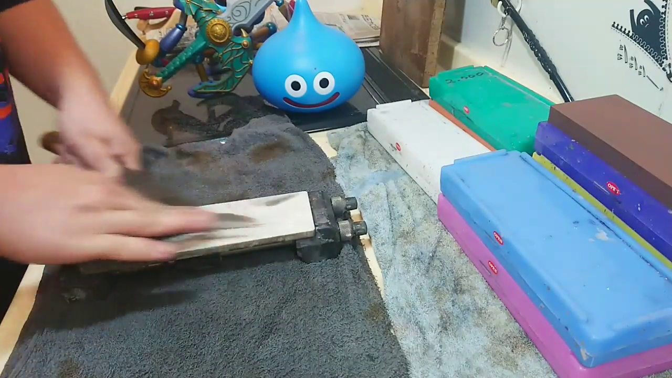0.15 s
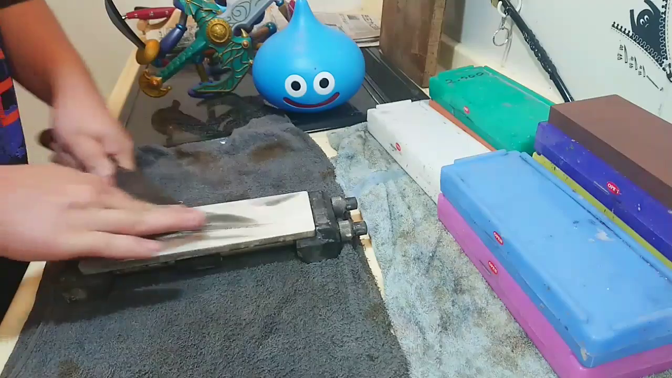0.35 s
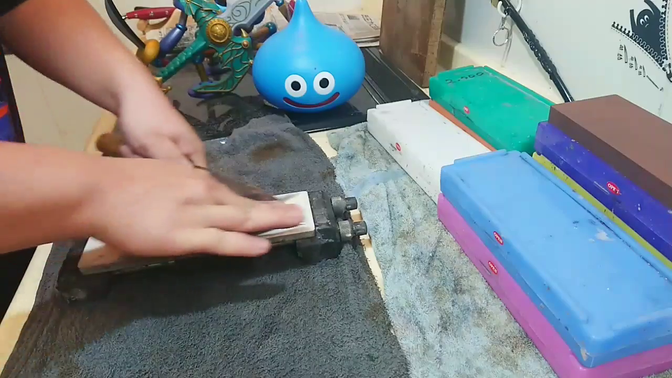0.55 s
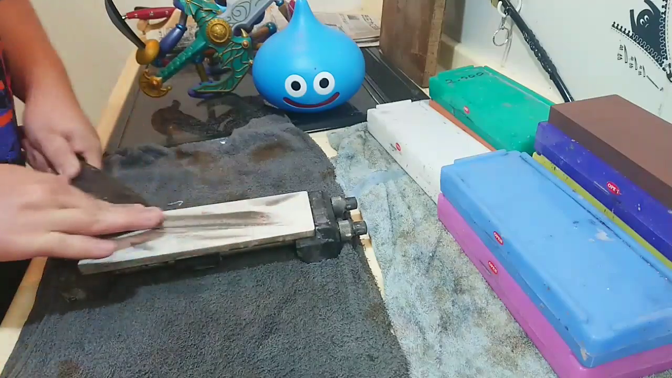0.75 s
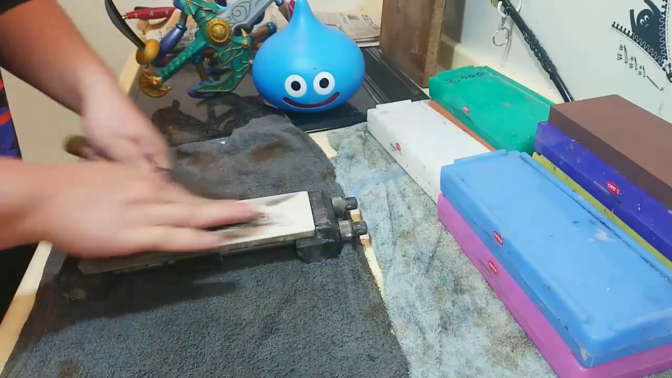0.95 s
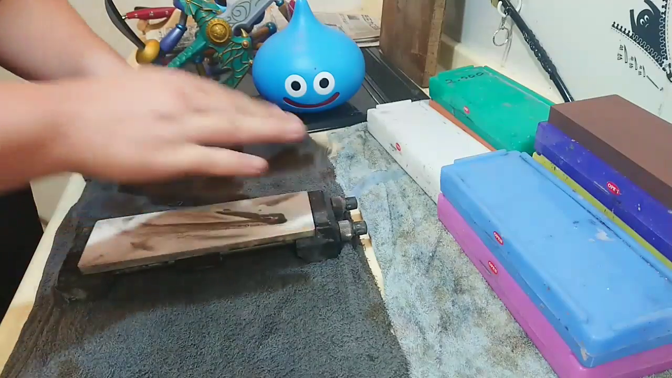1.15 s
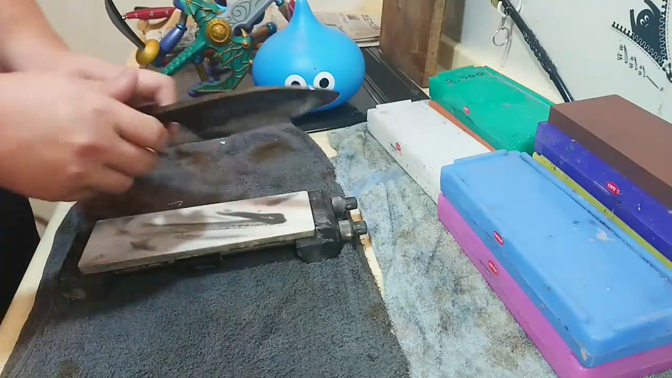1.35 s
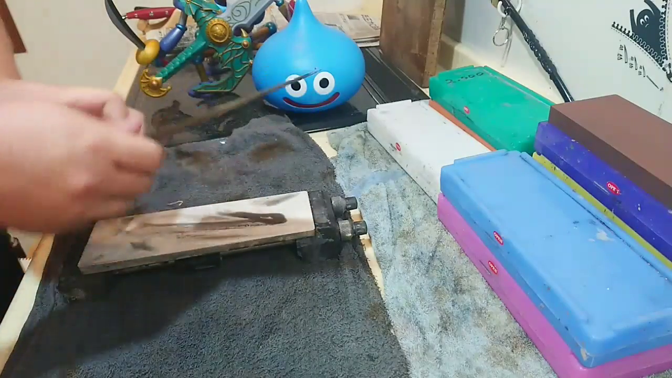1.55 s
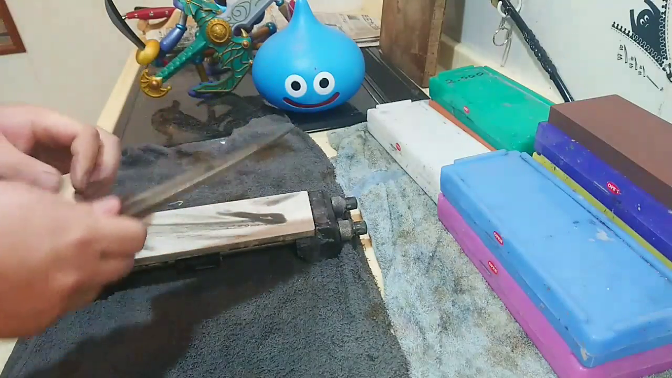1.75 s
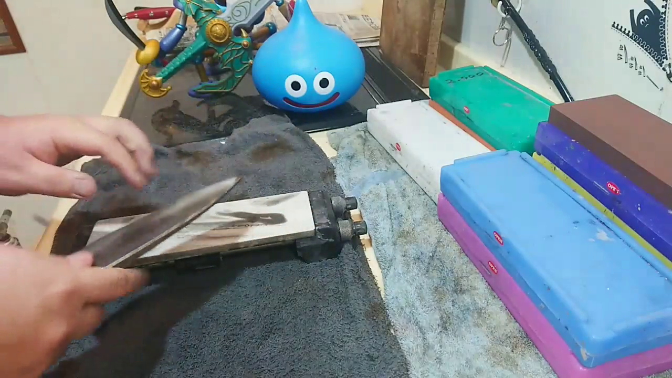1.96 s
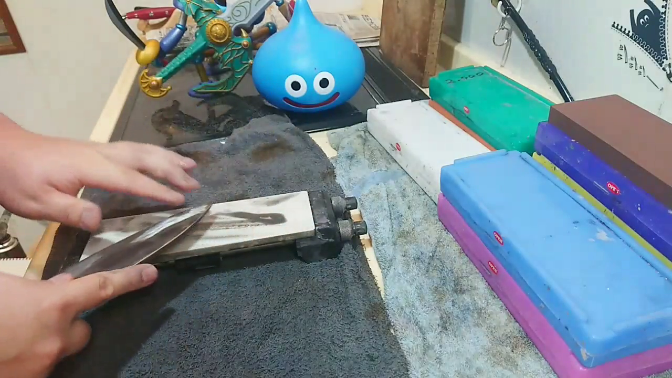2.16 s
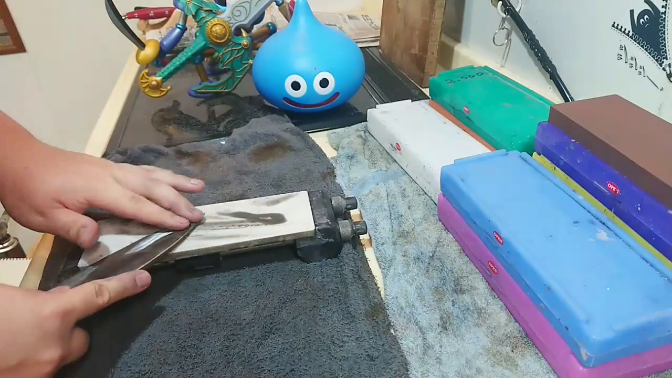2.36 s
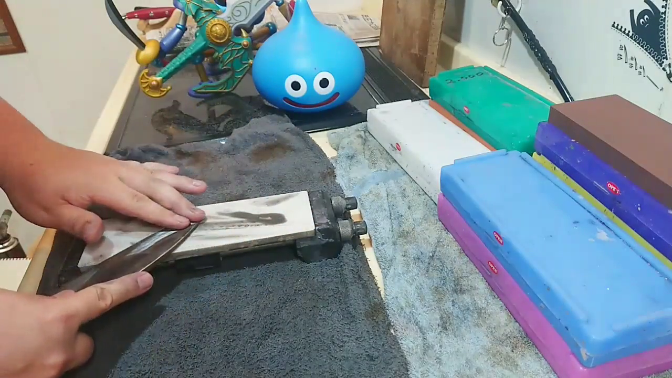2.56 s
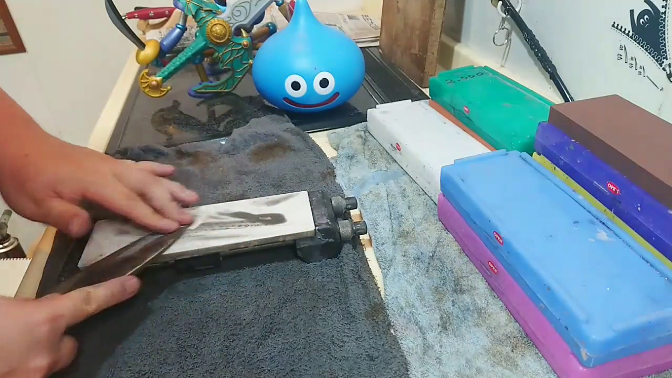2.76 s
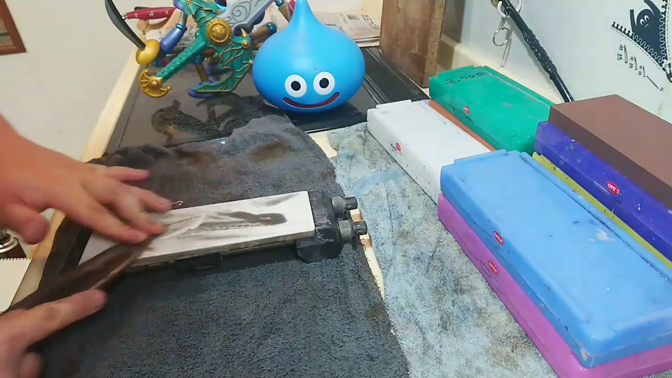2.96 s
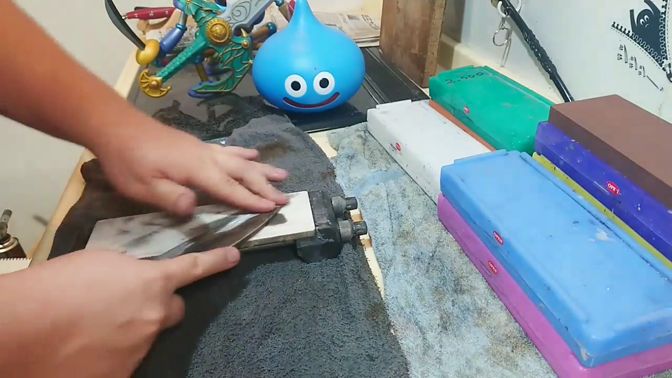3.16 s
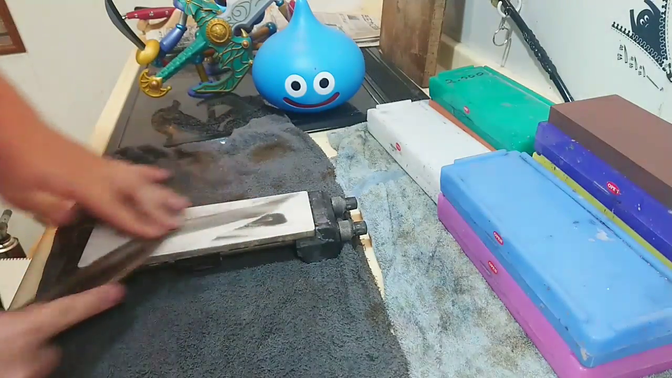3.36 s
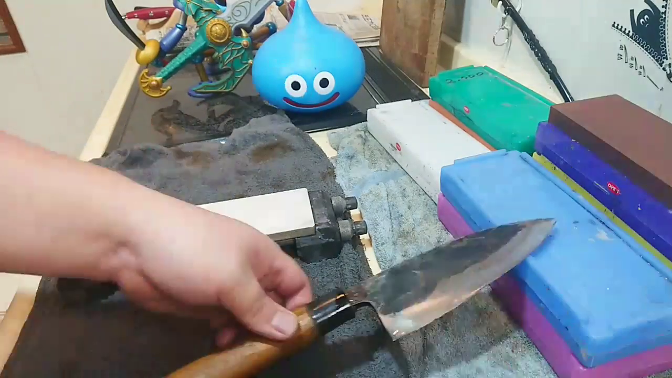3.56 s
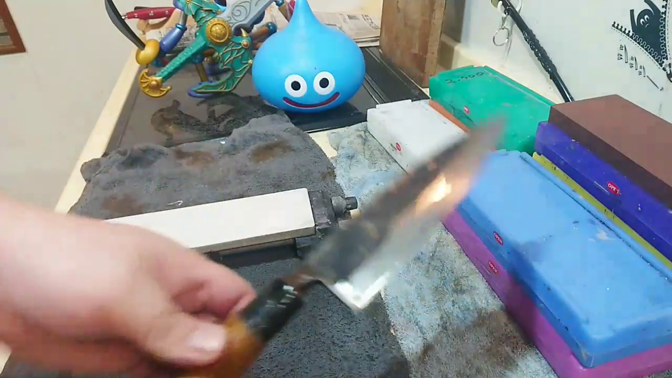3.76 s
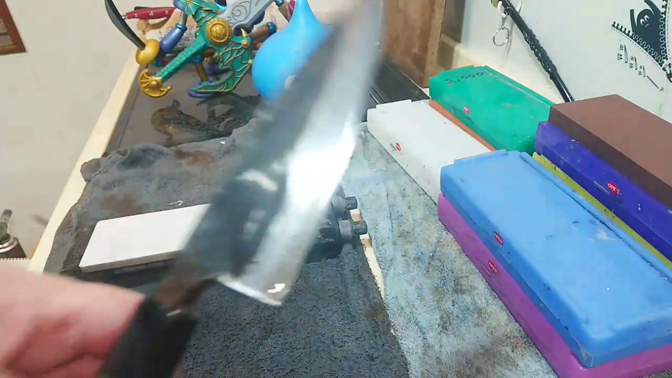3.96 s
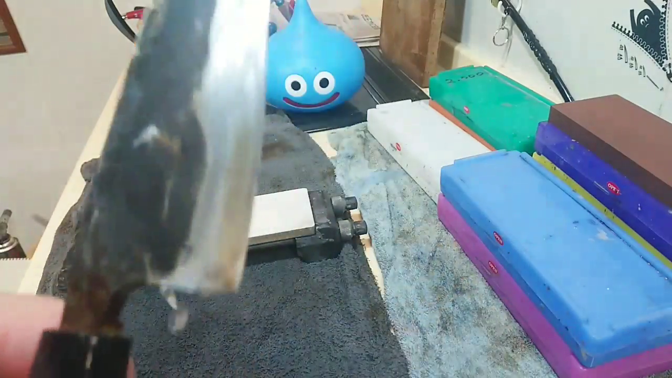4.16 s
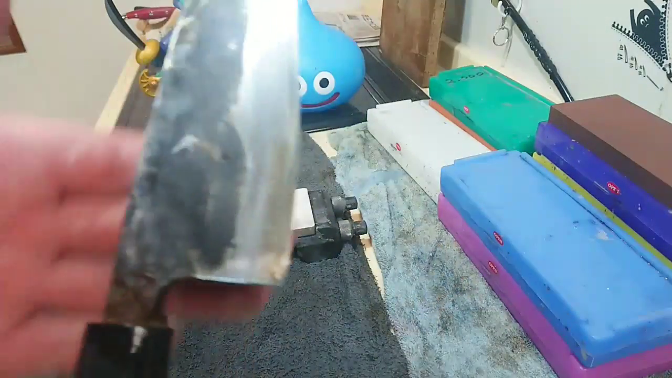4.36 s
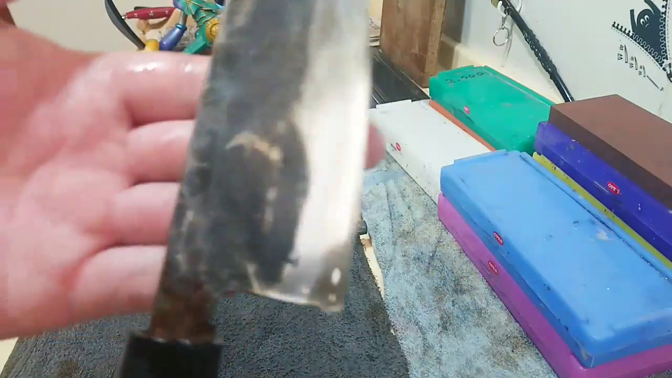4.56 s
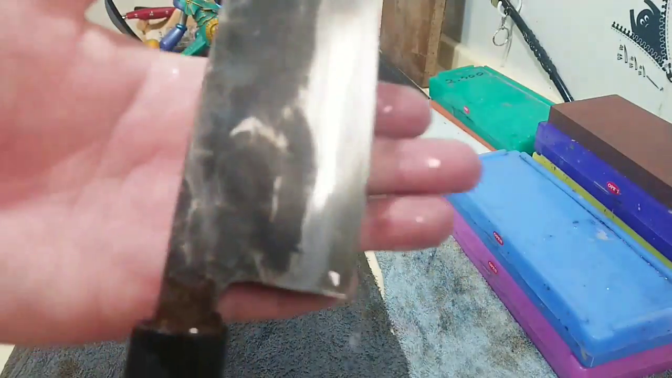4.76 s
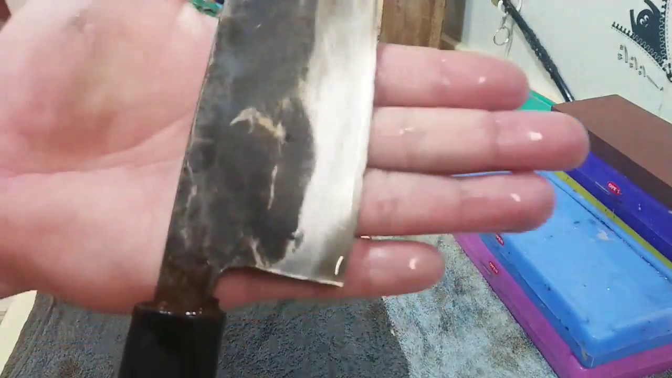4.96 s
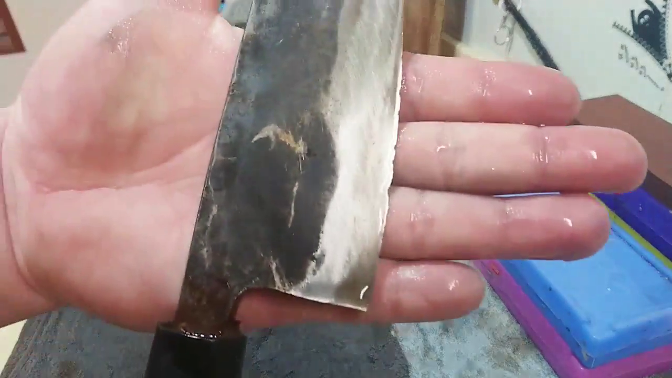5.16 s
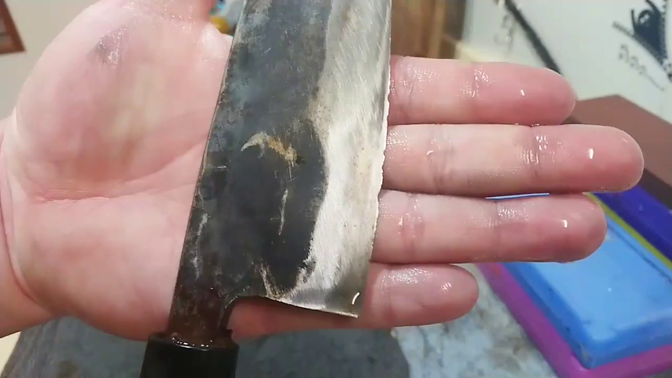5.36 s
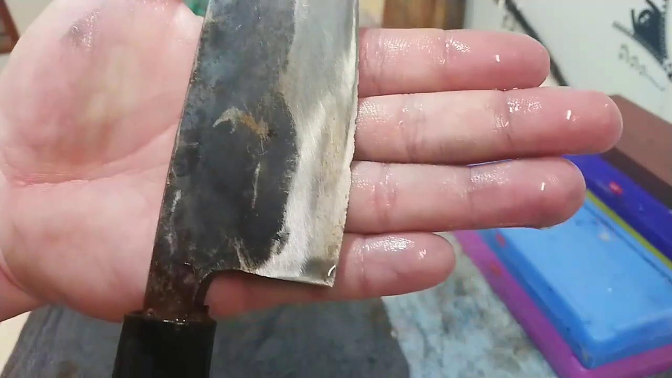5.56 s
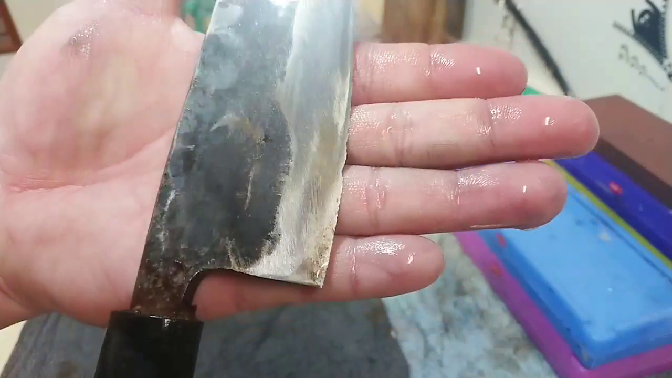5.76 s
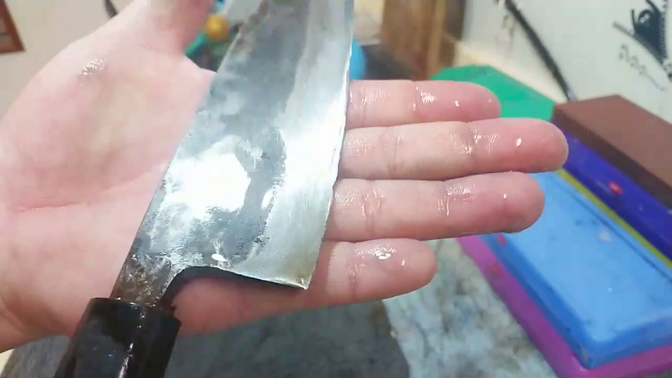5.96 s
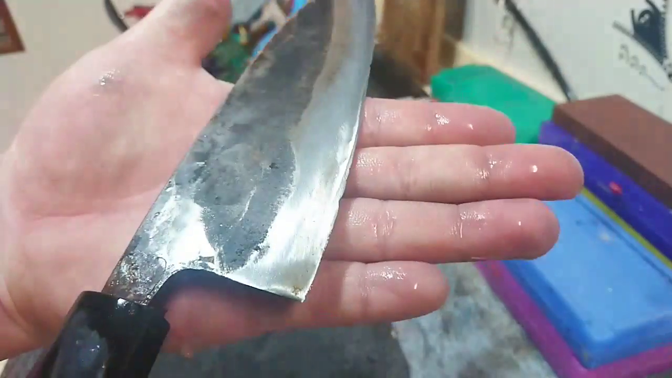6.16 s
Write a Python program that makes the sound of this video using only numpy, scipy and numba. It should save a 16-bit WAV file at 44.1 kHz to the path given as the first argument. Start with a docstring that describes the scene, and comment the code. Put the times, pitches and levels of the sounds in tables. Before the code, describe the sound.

Close stereo microphone, dry little room with a faint low hum. Short, hissing metal-on-stone strokes alternate for about a second, then fade as the knife is raised. A faint thin whistle and brushing precede a sharp double tap with a soft thud. Four firmer rasps with a metallic edge build up and cut off, leaving quiet fumbling, small clicks, muffled bumps and faint blade glints as the holder is handled.

```python
"""In a quiet room a steel blade rasps to and fro on a wet whetstone, on the left of a close stereo microphone:
grit noise drives the drifting modes of the hand-damped blade, over a rumbling bench. The blade lifts; a finger
slip sings in its free modes, a brush rustles and a thin sine whistle climbs. Decaying noise bursts and a soft
push tap the blade down and the strokes return. Then the microphone's holder is handled: band-passed ticks,
rustling noise and dull knocks through its shell, with two more groups of finger glints on the blade."""
import sys
import numpy as np
from scipy import signal
from scipy.fft import rfft, irfft
from scipy.io import wavfile
from scipy.ndimage import uniform_filter1d
from numba import njit

SR = 44100
rng = np.random.default_rng(int(sys.argv[2]) if len(sys.argv) > 2 else 0)


def transcribe(u):
    """Save the signal u as a 16-bit wav file named by the first command-line argument.

    u: samples, shape (n,) or (channels, n), limited to [-1, 1]; the rate is SR.
    q: integer samples, one column per channel.
    """
    v = np.clip(np.atleast_2d(u).T, -1, 1)
    q = np.round(v * 32767).astype(np.int16)
    wavfile.write(sys.argv[1], SR, q)


N = 274294  # samples

# Blade strokes: full_speed_start_s, full_speed_end_s, scrape_start_db, scrape_end_db, rise_db_per_s,
# fall_db_per_s, rounding_s; against the scrape: grind_db, bending_db, singing_db, upper_db; then bench_db
STROKES = [(0.0, 0.011, -50.5, -58, 400, 715, 0.05, -3.5, -42, -17, -8, -44),
           (0.111, 0.244, -46.5, -43, 487, 496, 0.034, -16.5, -33.5, -34, -21, -47.5),
           (0.36, 0.525, -47.5, -49, 300, 700, 0.034, -9, -21, -33, -15, -49.5),
           (0.605, 0.795, -47, -45, 795, 447, 0.013, -13, -35, -25, -10, -53.5),
           (0.894, 1.068, -47, -48, 580, 604, 0.026, -9, -25, -19.5, -11, -53),
           (1.108, 1.15, -58.5, -68.5, 400, 200, 0.0098, -8.5, -37, -14.5, -20.5, -66.5),
           (1.305, 1.45, -72.5, -77.5, 100, 101, 0.011, -9, -31, -22, -10, -90),
           (2.453, 2.443, -57, -65, 1526, 300, 0.0092, -10, -33, -16, -18, -59.5),
           (2.553, 2.583, -65.5, -63, 147, 448.3, 0.036, -12, -33, -32, -17, -64),
           (2.807, 2.88, -47.5, -45, 379, 546, 0.031, -13, -17, -7.5, -14, -48.5),
           (3.051, 3.122, -39, -38, 456, 332, 0.11, -16, -20.5, -20, -16, -49),
           (3.305, 3.385, -37.5, -37, 371.4, 380, 0.056, -15.5, -20, -27, -18, -51.5),
           (3.511, 3.513, -39, -39, 800, 12100, 0.01, -13.5, -33, -24, -17, -50)]
# Share of the scrape's rise and fall that each layer makes
GRIND_FOLLOWS, MODES_FOLLOW, BENCH_FOLLOWS = 0.62, 0.89, 0.66
# Bench rumble surges as the hand bears down or turns: centre_s, level_db
SURGES = [(0.225, -49), (0.425, -44.5), (0.59, -48), (0.702, -43), (0.83, -53), (0.975, -43.5),
          (2.946, -52), (3.125, -45), (3.24, -47.5), (3.31, -57.5), (3.46, -46)]
SURGE_S = 0.047  # from the centre to 1/e of the power
# Spectrum of the grit's rasp: frequency_hz, density_db (per Hz)
GRIT_SPECTRUM = [(210, -43), (350, -21.5), (379, -7), (574, -1.5), (740, -4), (986, -7.5), (1250, -15),
                 (1620, -5.5), (2000, -6), (2960, -4.5), (7590, 6), (10300, 2.5), (11900, -4.5),
                 (15800, -3.5)]
# The rasp's brightest part, sliding with the blade's place on the stone: time_s, centre_hz, lift_db
SHEEN = [(0.1, 6260, 4), (0.25, 7600, 0), (0.9, 4250, -0.5), (0.97, 7860, 0), (2.801, 4470, 3.5),
         (3.001, 7460, 1.5), (3.061, 7340, 4.5), (3.111, 5300, 6), (3.2, 5270, 0.5), (3.33, 5140, 5.5),
         (3.38, 7000, 2), (3.519, 7071, -3.5)]
SHEEN_OCTAVES, PATCHY = .2, .17  # reach of the lift; depth of the random patches
# Blade under the fingers, a bending pair, a singing pair, then upper modes: pitch_hz, width_hz, level_db
BLADE = [(990, 58, 1), (1095, 42, -.5), (2760, 200, 3.5), (3012, 90, 11.5), (1320, 200, -1),
         (2240, 78, 1.5), (2490, 63, -5.5), (3350, 170, 2.5), (3620, 120, 9), (3880, 80, 2.5),
         (4780, 49, 1.5), (5240, 56, 10.5), (5520, 120, 6), (5700, 60, 1), (6200, 40, -5), (7040, 60, 4),
         (7420, 120, 11), (7920, 150, 6.5), (9560, 60, 8)]
BENDING_MODES, SINGING_MODES, UPPER_MODES = BLADE[:2], BLADE[2:4], BLADE[4:]
# Fingers and stone detune the modes and widen them by a factor
DRIFT_PER_S, PRESSED_WIDTH = 12, 1.2
# Bench and stone holder resonances: pitch_hz, width_hz, level_db
BENCH = [(46.6, 13, -1.5), (77.6, 11.5, 3.5), (113.4, 7.1, 5.5), (166, 18.4, -7), (226, 35, -9),
         (277.7, 24, -7.5), (337, 44, -24)]

# Blade lifted clear, held by the handle: pitch_hz, width_hz, level_db
FREE_BLADE = [(3550, 160, -8), (4810, 63, 1.5), (5170, 72, -5), (5860, 90, -10), (7020, 70, -3)]
# Finger slips on the lifted blade: centre_s, half_length_s, level_db
GLINTS = [(1.62, 0.021, -82.5), (4.851, .006, -81), (4.862, .011, -75.5), (4.97, .012, -87),
          (4.992, 0.01, -79)]

# Two rustles, a short brush and the long handling: time_s, dull_db, bright_db, thrum_db
RUSTLES = [
    [(1.9, -92, -100, -77), (1.934, -89, -88, -72), (2.016, -87, -85, -81), (2.146, -86, -88, -79),
     (2.228, -80.5, -72, -83), (2.35, -86, -85, -85)],
    [(3.53, -66, -74, -70), (3.66, -67, -72.5, -65), (3.83, -68.5, -79, -70), (4.04, -64.5, -74.5, -66),
     (4.29, -66.5, -77, -67.5), (4.52, -69.5, -75, -71.5), (4.7, -84, -81, -74), (4.95, -91, -80.5, -71),
     (5.11, -74.5, -77.5, -65), (5.25, -83, -109, -84), (5.54, -93, -112.5, -66.5),
     (5.69, -81.5, -122, -74.5), (5.81, -80, -100, -70), (5.83, -77, -86, -70), (5.88, -77, -98, -71),
     (5.94, -77.5, -100, -71)],
]
# Spectrum of the rustle's bright part: frequency_hz, density_db (per Hz)
BRUSH_SPECTRUM = [(500, -28), (1200, -3.5), (2500, -4), (4000, -7.5), (5200, -4.5), (6000, -4.5),
                  (6500, -17.5), (7000, -2), (8500, -6), (11000, -6), (15800, -42)]

# Thin whistle's glide: time_s, pitch_hz, level_db (before the stereo weights)
WHISTLE = [(2.0, 8300, -97), (2.035, 8600, -94), (2.056, 9300, -86), (2.11, 9750, -85), (2.21, 9750, -84),
           (2.26, 9620, -92), (2.35, 9500, -94)]
# Thin lines over the glide, the main one and three fainter ones above it: pitch_ratio, level_db
WHISTLE_LINES = [(1, 0), (1.085, -4), (1.16, -11), (1.5, -17)]

# Blade taps on the stone: start_s, click_db (peak), thump_db (peak, against the click)
TAPS = [(2.3596, -57, -14), (2.3631, -33.5, 1), (2.3712, -32.5, -8.5), (2.446, -45.5, -6.5),
        (2.496, -78, -8), (2.5457, -57, -9), (2.5634, -53.5, -3.5), (2.5738, -63, -4), (2.603, -67, -1),
        (2.7117, -68, -11), (2.7396, -50, -11.5)]
THUMP_LAG_S = .0038  # the weight lands just after the edge
STRUCK_TILT_DB = -1.6  # per octave: a blow stirs the low modes more than grit does
STRUCK_WIDTH_HZ = 220  # no mode is wider than this when the blade is only laid down

# Small handling ticks: start_s, peak_db, centre_hz
TICKS = [(3.5366, -52, 9200), (3.565, -58, 3350), (3.59, -54, 5320), (3.592, -52.5, 8300),
         (3.7186, -63, 7660), (3.752, -60, 4200), (3.7915, -61, 8100), (3.8445, -60, 7440),
         (3.881, -57, 5300), (3.924, -57.5, 5540), (4.001, -50, 7600), (4.027, -57.5, 3775),
         (4.116, -56.5, 10100), (4.1412, -52.5, 8050), (4.246, -60, 5800), (4.3313, -55, 5470),
         (4.4193, -55.5, 5700), (4.66, -60, 7600), (4.694, -66, 9900), (4.731, -66, 10200),
         (4.8394, -68, 7800), (4.982, -59, 1720), (4.94, -73, 10300), (4.987, -66, 3530),
         (4.994, -64.5, 2630), (5.013, -67, 1780), (5.052, -63.5, 5160), (5.056, -75, 5870),
         (5.1056, -66.5, 8800), (5.122, -66, 12800), (5.8191, -69, 2930), (5.822, -84, 4600),
         (5.824, -68, 1900)]
FAINT_TICKS, FAINT_SPAN_S, FAINT_DB = 34, (3.55, 5.15), -69  # count, time span, loudest peak

# Dull knocks on the microphone holder: start_s, peak_db, low_mode_db, t60_s
KNOCKS = [(3.925, -62, -15, .4), (3.949, -56, -27, .4), (3.974, -53.5, -21, .4), (4.052, -50, 3, .4),
          (4.078, -54, -5, .4), (4.41, -55.5, -14, .4), (4.465, -56, -3.5, .2), (4.488, -50, 0, .2),
          (4.635, -52, -8, 0.3), (4.68, -59, -10, .3), (4.72, -60, -8, .3), (4.904, -52, -3, .15),
          (4.935, -55, -3, .2), (4.981, -51, -3, .2), (4.995, -51, -1, .25), (5.025, -52.5, -1, .2),
          (5.05, -51, 0, .08), (5.206, -49.5, -13, 0.17), (5.443, -59.5, -26.5, 0.11),
          (5.478, -62, 13, 0.15), (5.539, -54, -4.5, 0.19), (5.566, -57, -8, 0.11), (5.707, -57, 4, 0.1),
          (5.745, -58.5, 6, .4), (5.817, -49.5, 6, .24), (5.999, -55, -2, .13)]
# Holder shell resonances: pitch_hz, width_hz, level_db
HOLDER = [(259, 50, 4.5), (418, 41, 5), (497, 30, 2), (564, 84, -2.5), (754, 30, -1.5), (910, 610, -11),
          (1131, 80, -3)]
# The shell carries very little above 1.3 kHz
SHELL_TOP = signal.ellip(5, 1, 45, 1300, fs=SR, output="sos")

# Spectrum of the room tone: frequency_hz, density_db (per Hz, before scaling to ROOM_DB)
ROOM_SPECTRUM = [(18, -40.5), (30, -7), (60, 3.5), (178, -6.5), (218, -22), (295, -25.5), (411, -21),
                 (478, -17), (571, -26.5), (1540, -29), (2800, -37), (4360, -42.5), (4950, -39),
                 (5600, -43), (6400, -47), (7300, -38.5), (9580, -33), (13000, -51)]
ROOM_DB = -69  # rms before the wavering and the stereo spread

# Stereo tilt: frequency_hz, left_minus_right_db
LEFT_LEAN = [(60, 5.5), (110, 3), (200, 7.5), (380, 9), (700, 8.5), (1290, 8), (2380, 10), (4400, 14),
             (8120, 3), (15000, 4)]
# Stereo likeness: frequency_hz, correlation (left against right, -1 to 1)
LIKENESS = [(60, 0.99), (130, 0.79), (290, 0.93), (640, -0.0093), (1400, 0.099), (3100, 0.4), (8000, 0.14)]
TOP_HZ = 15850  # the recorder's upper edge


def undb(db):
    """Turns decibels into an amplitude factor."""
    return 10 ** (np.asarray(db) / 20)


def unit(x):
    """Scales a sound to rms 1."""
    return x / np.sqrt(np.mean(x ** 2))


def over_time(table):
    """Joins dB columns by straight lines, with short fades to -150 dB outside the table."""
    s, *columns = np.transpose(table)
    s = np.r_[s[0] - .02, s, s[-1] + .004]
    return [np.interp(np.arange(N) / SR, s, np.r_[-150, c, -150]) for c in columns]


def over_hz(table, size):
    """Reads a frequency table at every bin of a transform, on a log frequency scale."""
    hz, value = np.transpose(table)
    return np.interp(np.log(np.fft.rfftfreq(size, 1 / SR) + 1), np.log(hz), value)


def colour(x, spectrum):
    """Shapes a steady sound by a spectrum in dB."""
    return irfft(rfft(x) * undb(over_hz(spectrum, N)), N)


def ring(x, modes):
    """Sums fixed resonances, neighbours in opposite phase."""
    total = 0
    for k, (hz, width, db) in enumerate(modes):
        mode = signal.lfilter(*signal.iirpeak(hz, hz / width, SR), x)
        total = total + (-1) ** k * undb(db) * mode
    return total


def band(x, lo_hz, hi_hz):
    """Keeps the sound between two frequencies, with gentle slopes."""
    return signal.sosfilt(signal.butter(2, [lo_hz, hi_hz], "band", fs=SR, output="sos"), x)


def walk(rate):
    """Wanders at random: levels held 1 / rate s, then smoothed twice; spread near 1."""
    k = int(SR / rate)
    held = np.repeat(rng.standard_normal(N // k + 1), k)
    return 1.3 * uniform_filter1d(uniform_filter1d(held, k), k)[:N]


def noise():
    """Makes two unrelated white noises of full length."""
    return rng.standard_normal((2, N))


def grains(spread_db):
    """Crackles densely: every sample is a grain, some bigger than the rest."""
    size = np.minimum(rng.exponential(size=N), 4)
    return unit(noise() * undb(spread_db * size))


def burst(t60, seconds):
    """Makes two unrelated noises that decay by 60 dB in t60 seconds."""
    t = np.arange(int(seconds * SR)) / SR
    return rng.standard_normal((2, len(t))) * undb(-60 * t / t60)


def soften(sound, seconds):
    """Ramps the start of a short sound up in a straight line."""
    return sound * np.minimum(np.arange(sound.shape[1]) / (seconds * SR), 1)


def add(out, s, sound, db):
    """Lays a short sound in at time s with the given peak."""
    i = int(s * SR)
    part = sound[:, :N - i]
    out[:, i:i + part.shape[1]] += part * undb(db) / np.abs(sound).max()


def spread(pair):
    """Mixes a shared and a differing signal into left and right, alike in the bass and tilted left."""
    shared, differing = rfft(pair)
    likeness = np.clip(over_hz(LIKENESS, N), -.99, .99)
    tilt = undb(over_hz(LEFT_LEAN, N) / 2)
    mid, side = np.sqrt(1 + likeness) * shared, np.sqrt(1 - likeness) * differing
    return irfft(np.array([(mid + side) * tilt, (mid - side) / tilt]), N)


def room_tone():
    """A low hum of the house, wavering, and a faint hiss that wavers less."""
    tone = unit(colour(noise(), ROOM_SPECTRUM))
    hum = band(tone, 24, 83)
    hiss = tone - hum
    return (hum * undb(3.7 * walk(7)) + hiss * undb(1.3 * walk(3) + 1.3 * walk(12))) * undb(ROOM_DB)


def stroke_levels():
    """Each stroke has a rounded rise and fall in dB; the other layers follow only in part."""
    t = np.arange(N) / SR
    power = np.zeros((6, N))
    for (start, end, first_db, last_db, rise, fall, knee,
         grind_db, bending_db, singing_db, upper_db, bench_db) in STROKES:
        before = np.hypot(np.maximum(start - t, 0), knee) - knee
        after = np.hypot(np.maximum(t - end, 0), knee) - knee
        drop = rise * before + fall * after
        held = np.interp(t, [start, end], [first_db, last_db])
        grind = (first_db + last_db) / 2 + grind_db - GRIND_FOLLOWS * drop
        rung = held - MODES_FOLLOW * drop
        rumble = bench_db - BENCH_FOLLOWS * drop
        power += undb([held - drop, grind, rung + bending_db, rung + singing_db, rung + upper_db, rumble]) ** 2
    for s, db in SURGES:
        power[5] += undb(db) ** 2 * np.exp(-((t - s) / SURGE_S) ** 2)
    return np.sqrt(power)


@njit
def resonate(pair, g, k):
    """Band-pass of gain 1 whose tuning g moves from sample to sample, with damping k."""
    y = np.empty_like(pair)
    for c in range(2):
        b, l = 0., 0.  # band and low states
        for i in range(len(g)):
            v = (b + g[i] * (pair[c, i] - l)) / (1 + g[i] * (g[i] + k))
            b, l, y[c, i] = 2 * v - b, l + 2 * g[i] * v, k * v
    return y


def stir(x, modes, wander_db, drift):
    """Modes under a moving load: each drifts in pitch by a share and swells on its own."""
    out = 0
    for hz, width, db in modes:
        tuning = np.tan(np.pi * hz / SR) * (1 + drift * walk(DRIFT_PER_S))
        drive = x * undb(db + wander_db * walk(16))
        out = out + resonate(drive, tuning, PRESSED_WIDTH * width / hz)
    return unit(out)


def slurry_sheen(bright):
    """Slurry builds and clears under the edge, so narrow bands of the rasp swell and slide."""
    s, centre_hz, lift_db = np.transpose(SHEEN)
    t = np.arange(N) / SR
    centre = np.interp(t, s, centre_hz)
    lift = np.interp(t, s, undb(lift_db) - 1)
    patches = bright
    for lo_hz in 2500 * 1.17 ** np.arange(11):
        nearness = np.exp(-(np.log2(1.08 * lo_hz / centre) / SHEEN_OCTAVES) ** 2)
        swell = PATCHY * walk(23.96) + lift * nearness
        patches = patches + swell * band(bright, lo_hz, 1.21 * lo_hz)
    return unit(patches)


def scraping():
    """Grit tears at the edge: broad crackle, blade modes and a rumble in the bench."""
    scrape_gain, grind_gain, bending_gain, singing_gain, upper_gain, bench_gain = stroke_levels()
    grit = grains(1.7) * undb(1.1 * walk(70))
    # the moving contact point stirs each mode more or less from moment to moment
    upper = stir(grit, UPPER_MODES, 4, .025)
    bending = stir(grit, BENDING_MODES, 4.5, .04)
    singing = stir(grit, SINGING_MODES, 2.5, .008)
    rasp = colour(grit, GRIT_SPECTRUM)
    grind = band(rasp, 200, 3630)
    sheen = slurry_sheen(rasp - grind)
    bench = band(ring(noise() * undb(1.57 * walk(25.08)), BENCH), 34, 510)
    blade = upper * upper_gain + bending * bending_gain + singing * singing_gain
    return sheen * scrape_gain + unit(grind) * grind_gain + blade + unit(bench) * bench_gain


def glints():
    """A wet finger slips on the lifted blade and its free modes sing briefly."""
    t = np.arange(N) / SR
    slip = sum(undb(db) * np.exp(-((t - s) / length) ** 2) for s, length, db in GLINTS)
    return unit(ring(grains(4.5), FREE_BLADE)) * slip


def rustle():
    """Fingers brush the holder: dull noise rings its shell, with bright crackle and a low thrum."""
    dull_db, bright_db, thrum_db = np.max([over_time(table) for table in RUSTLES], axis=0)
    dull = band(ring(noise() * undb(2.2 * walk(30)), HOLDER), 220, 1400)
    flutter = undb(2.2 * walk(25))
    bright = colour(grains(3) * flutter, BRUSH_SPECTRUM)
    thrum = band(noise(), 22, 157)
    return unit(dull) * undb(dull_db) + unit(bright) * undb(bright_db) + unit(thrum) * undb(thrum_db)


def whistle():
    """A few thin sine lines waver together in pitch and each on its own in level."""
    s, hz, _ = np.transpose(WHISTLE)
    pitch = np.interp(np.arange(N) / SR, s, hz) * (1 + .006 * walk(700))
    phase = 2 * np.pi * np.cumsum(pitch) / SR
    lines = sum(undb(db + 5.2 * walk(40)) * np.sin(ratio * phase) for ratio, db in WHISTLE_LINES)
    return lines * undb(over_time(WHISTLE)[1]) * [[1.4], [.7]]  # shared and differing weights


def taps():
    """The edge clicks on the stone, the blade rings briefly and the bench thumps."""
    out = np.zeros((2, N))
    # the weight of the blade lands as one soft push, mostly shared by both sides
    push = np.exp(-((np.arange(SR // 2) / SR - THUMP_LAG_S) / 0.0013) ** 2) * [[1], [.15]]
    thump = unit(ring(push, BENCH[2:3]))
    thump = thump + undb(-1.0) * unit(ring(push, BENCH[1:2])) + undb(-3.5) * unit(ring(push, BENCH[3:]))
    struck = [(hz, min(1.6 * width, STRUCK_WIDTH_HZ), db + STRUCK_TILT_DB * np.log2(hz / 3000))
              for hz, width, db in BLADE]
    for s, db, thump_db in TAPS:
        ragged_tail = burst(0.17, .4) * undb(3 * walk(70)[:int(.4 * SR)])
        crack = burst(0.008, .4) + undb(-24) * ragged_tail
        crack = soften(crack, 0.0013)  # the edge rolls onto the stone
        add(out, s, ring(crack, struck) + 0.45 * band(crack, 400, 12000), db)
        add(out, s, thump, db + thump_db)
    return out


def ticks():
    """Small clicks as fingers shift on the holder: short noise bursts in narrow and bright bands."""
    out = np.zeros((2, N))
    chance = rng.random((FAINT_TICKS, 3))
    faint = [(np.interp(a, [0, 1], FAINT_SPAN_S), FAINT_DB - 6 * b, 3500 * 3 ** c) for a, b, c in chance]
    for s, db, hz in TICKS + faint:
        click = undb(1.0) * burst(0.004, .15) + undb(-4.0) * burst(0.12, .15)
        click = soften(click, 0.0015)
        body = band(click, 0.903 * hz, 1.09 * hz)
        add(out, s, body + 0.24 * band(click, 2900, 10660) + 0.4 * band(click, 7140, 8650), db)
    return out


def knocks():
    """Fingers knock and rub the holder, ringing the low modes of its shell."""
    out = np.zeros((2, N))
    stutter = undb(2.5 * walk(90))  # the rub catches and slips
    for s, db, low_db, t60 in KNOCKS:
        rub = burst(np.clip(t60, .02, 1), .4) * np.roll(stutter, -int(s * SR))[:int(.4 * SR)]
        # carried through the shell, so nearly alike in both capsules
        blow = (undb(9.5) * burst(0.023, .4) + rub) * [[1], [.4]]
        blow = soften(blow, 0.0024)  # soft fingertips
        shell = ring(blow, HOLDER[1:]) + undb(low_db) * ring(blow, HOLDER[:1])
        add(out, s, signal.sosfilt(SHELL_TOP, band(shell, 130, 1400)), db)
    return out


def small_room(near):
    """A small soft room smears the crackle a little with a decaying noise tail."""
    tail = burst(0.12, 0.32)
    echo = band(tail, 87, 8600) / np.sqrt(np.sum(tail[0] ** 2))
    return near + undb(-9.5) * signal.fftconvolve(near, echo, axes=1)[:, :N]


def scene():
    """Blade work in the small room, joined by the quieter sounds and the room tone."""
    blade_on_stone = small_room(scraping() + taps())
    handling = rustle() + ticks() + knocks()
    return spread(blade_on_stone) + spread(handling + glints() + whistle()) + spread(room_tone())


def record(dry):
    """The recorder cuts the top steeply."""
    return signal.sosfilt(signal.ellip(10, .2, 80, TOP_HZ, fs=SR, output="sos"), dry)


dry = scene()
out = record(dry)
transcribe(out)
```